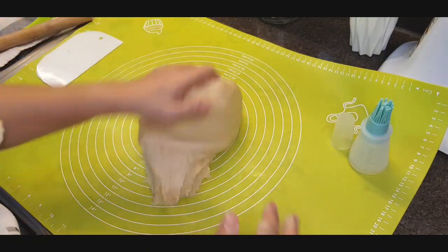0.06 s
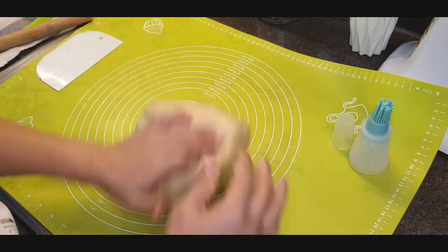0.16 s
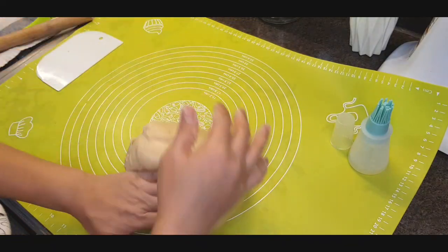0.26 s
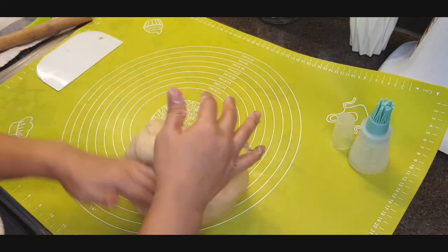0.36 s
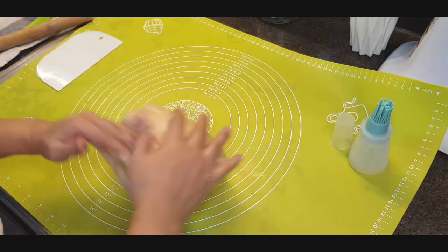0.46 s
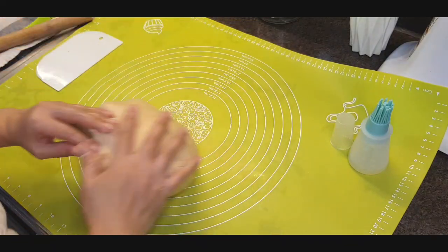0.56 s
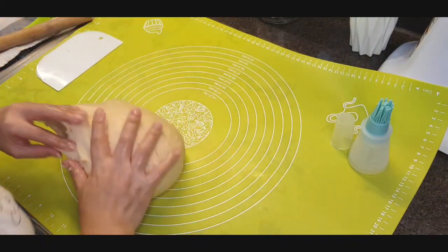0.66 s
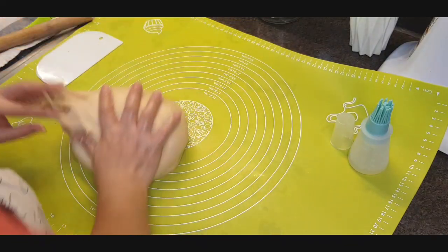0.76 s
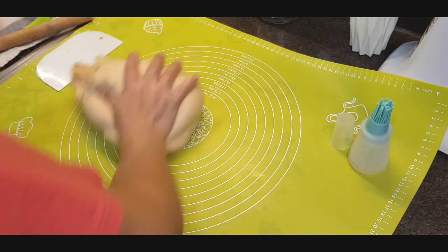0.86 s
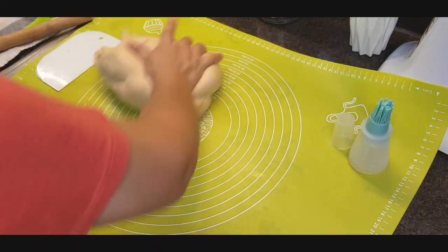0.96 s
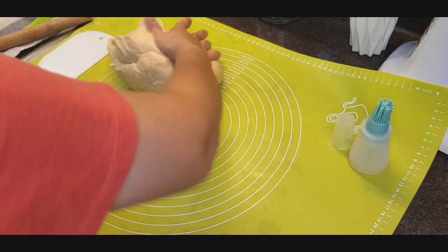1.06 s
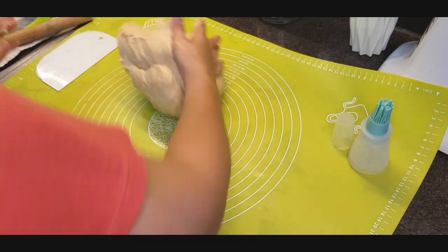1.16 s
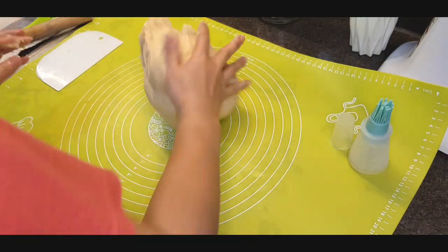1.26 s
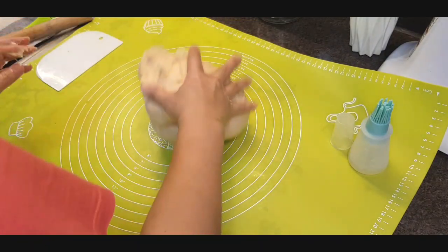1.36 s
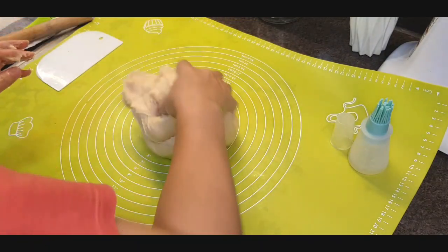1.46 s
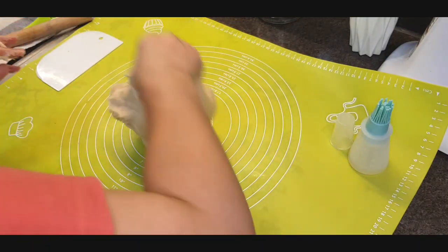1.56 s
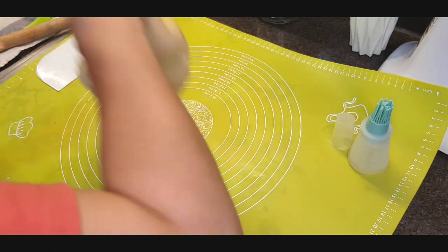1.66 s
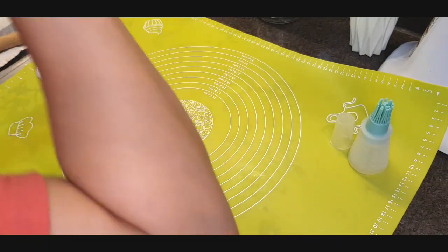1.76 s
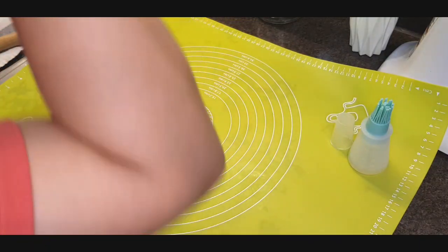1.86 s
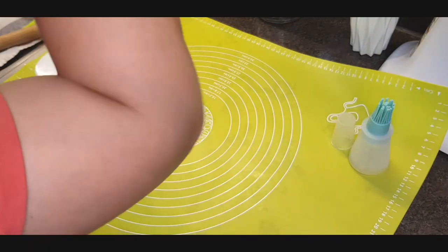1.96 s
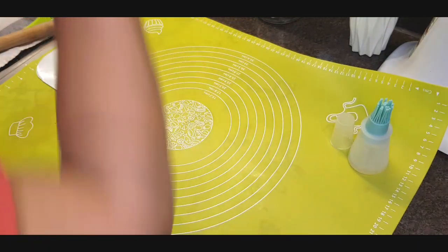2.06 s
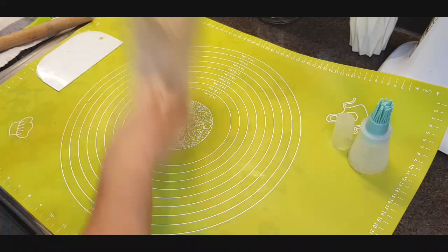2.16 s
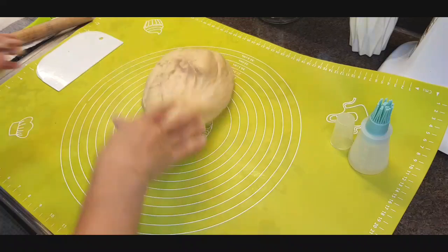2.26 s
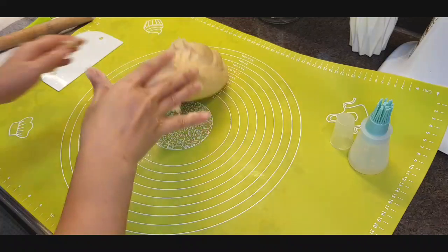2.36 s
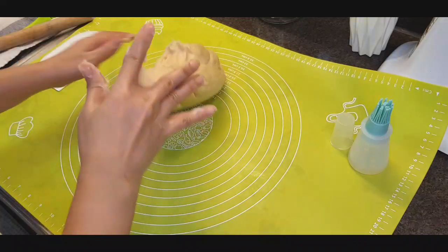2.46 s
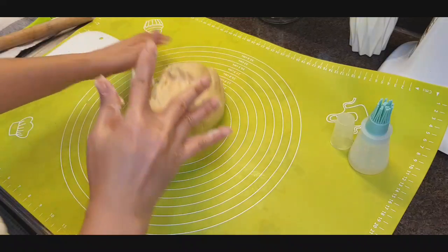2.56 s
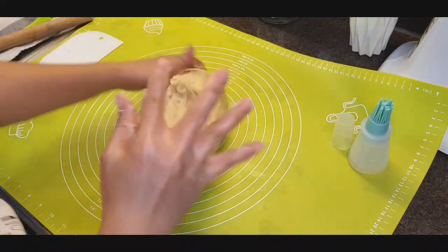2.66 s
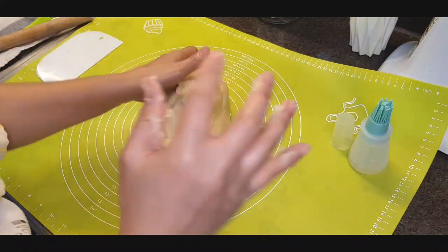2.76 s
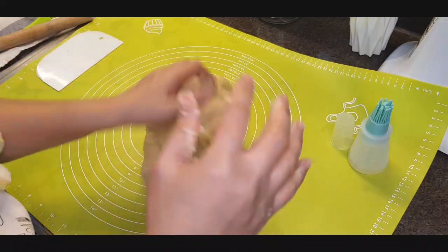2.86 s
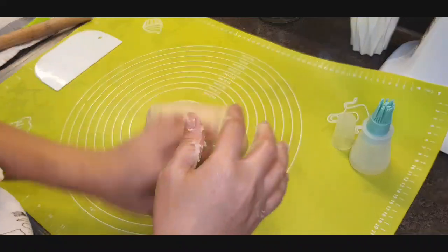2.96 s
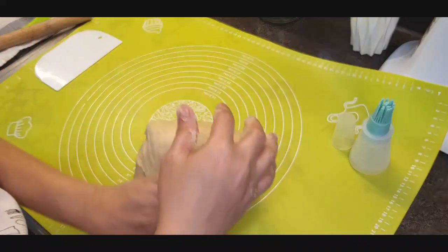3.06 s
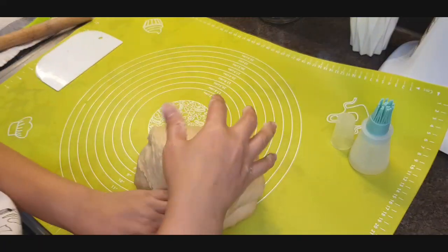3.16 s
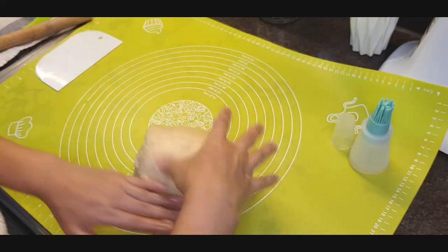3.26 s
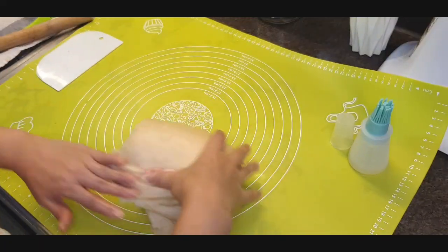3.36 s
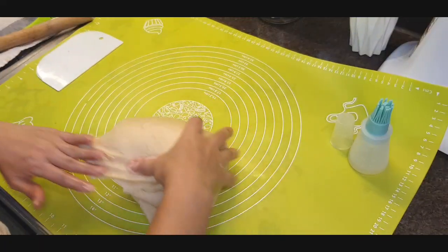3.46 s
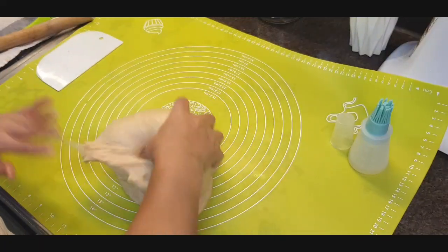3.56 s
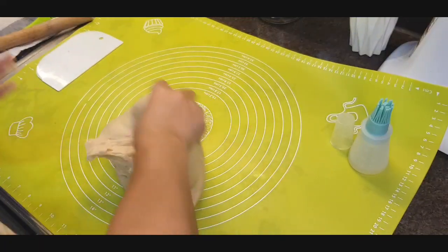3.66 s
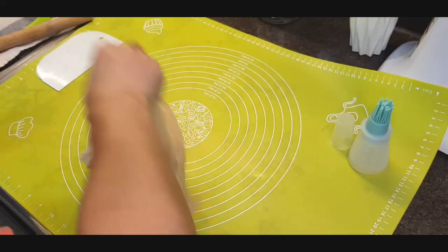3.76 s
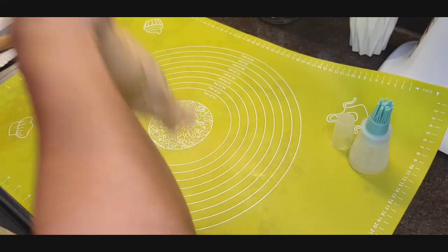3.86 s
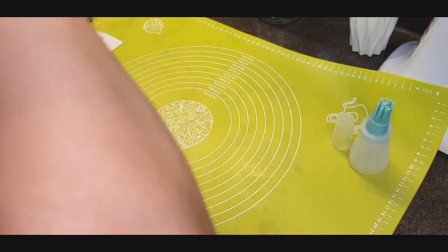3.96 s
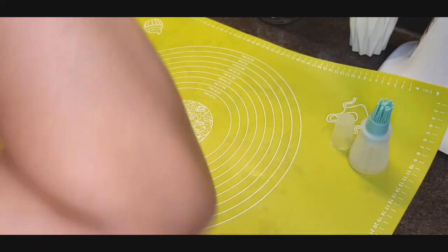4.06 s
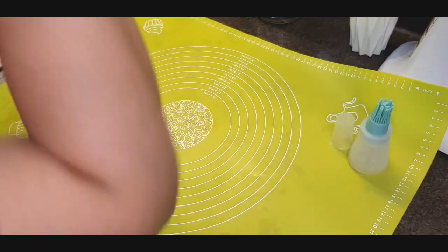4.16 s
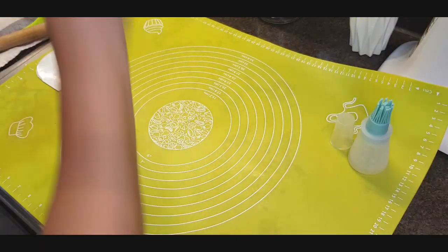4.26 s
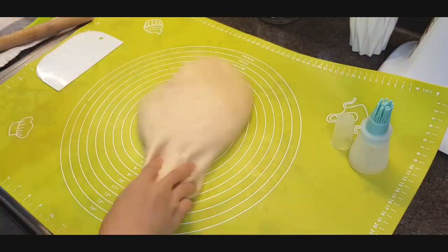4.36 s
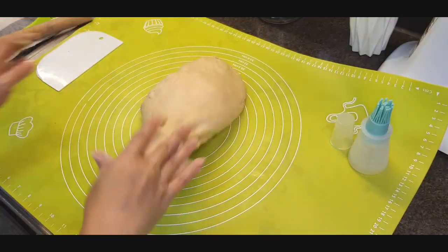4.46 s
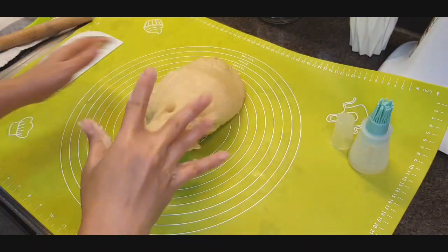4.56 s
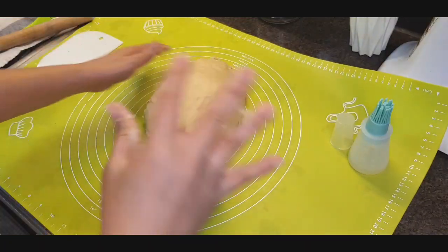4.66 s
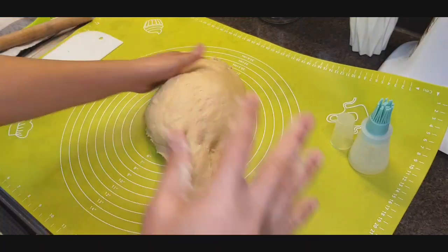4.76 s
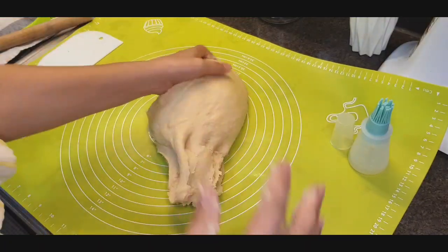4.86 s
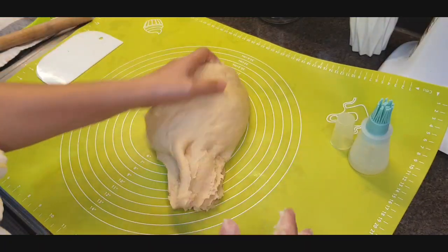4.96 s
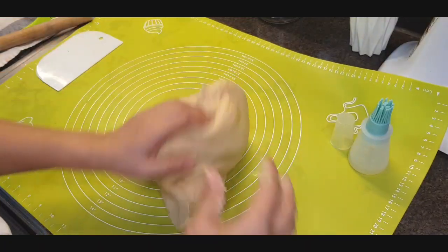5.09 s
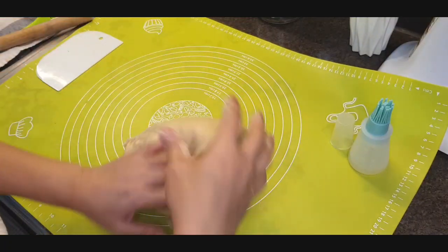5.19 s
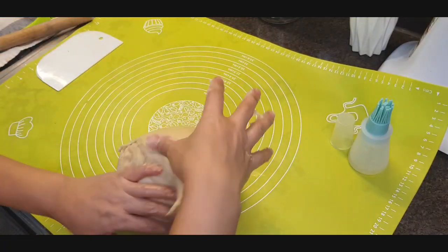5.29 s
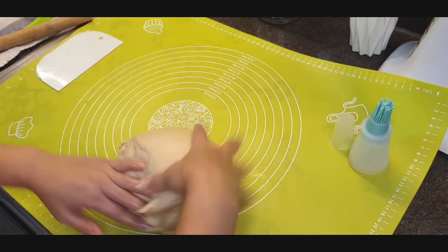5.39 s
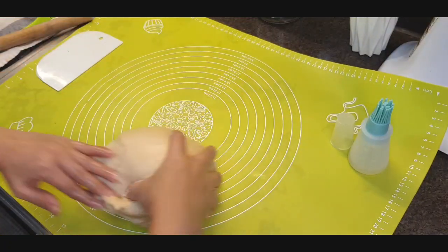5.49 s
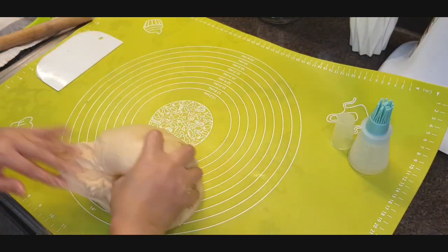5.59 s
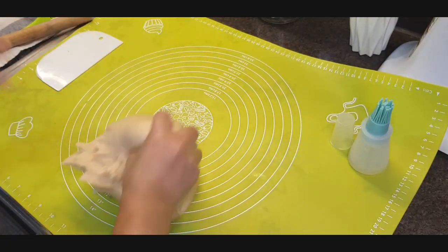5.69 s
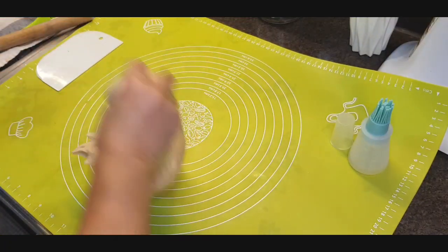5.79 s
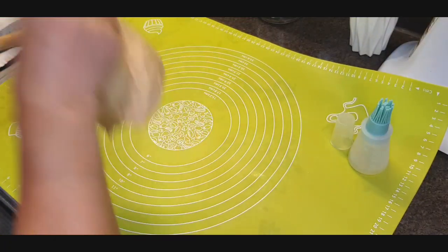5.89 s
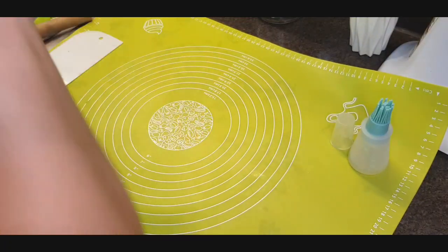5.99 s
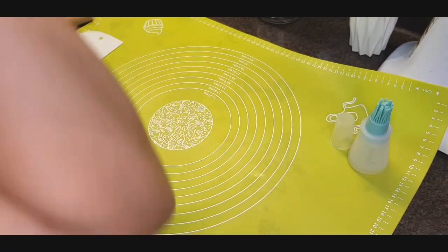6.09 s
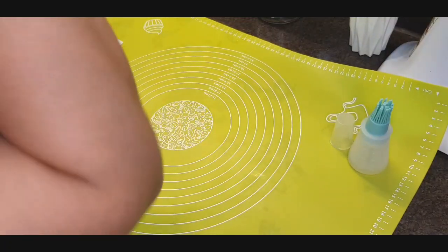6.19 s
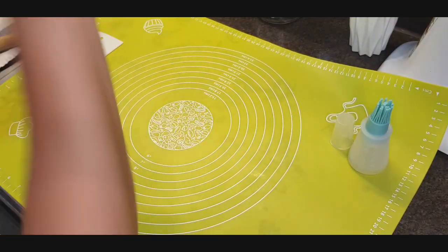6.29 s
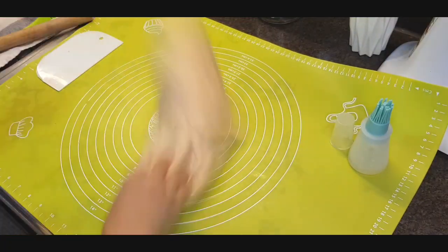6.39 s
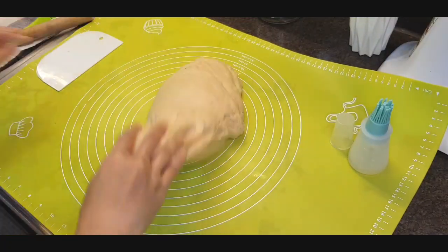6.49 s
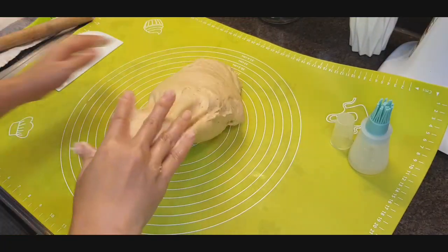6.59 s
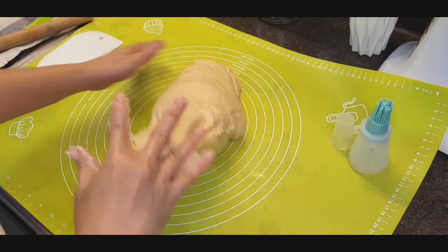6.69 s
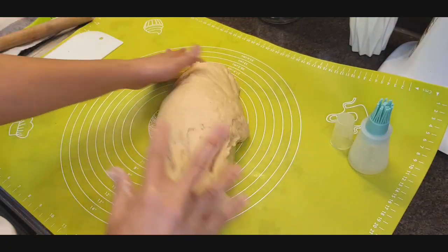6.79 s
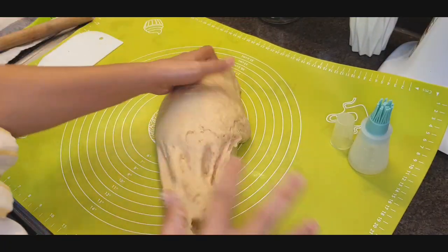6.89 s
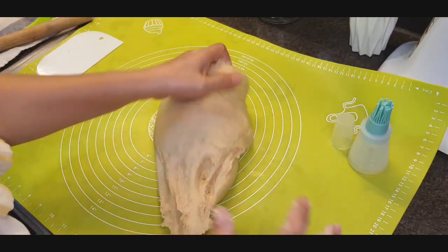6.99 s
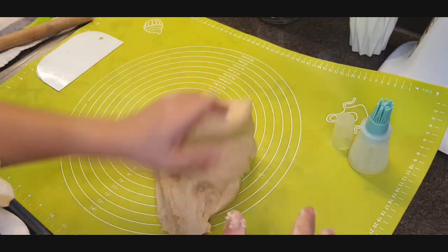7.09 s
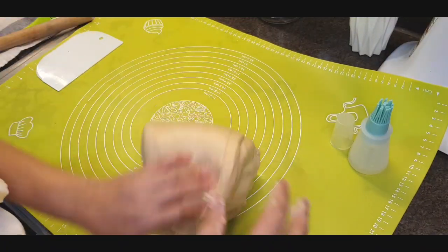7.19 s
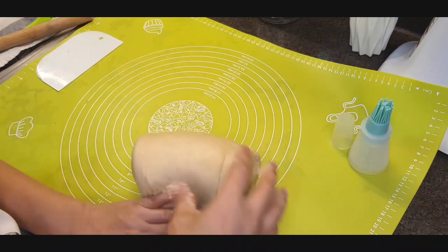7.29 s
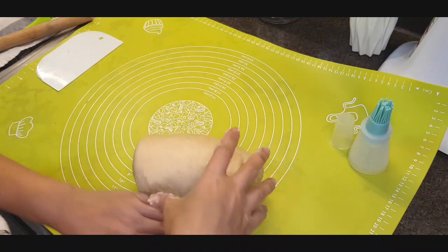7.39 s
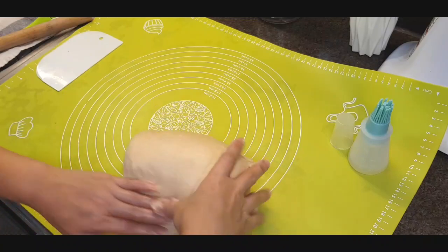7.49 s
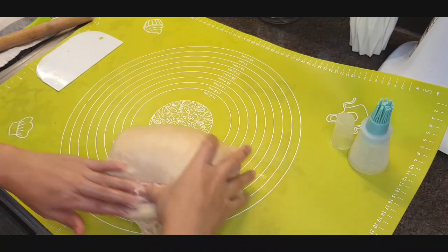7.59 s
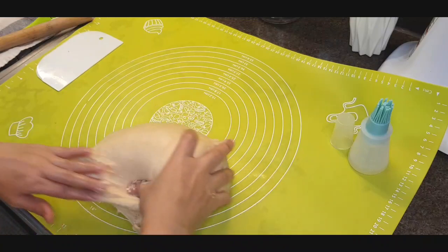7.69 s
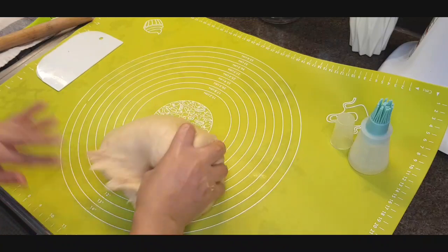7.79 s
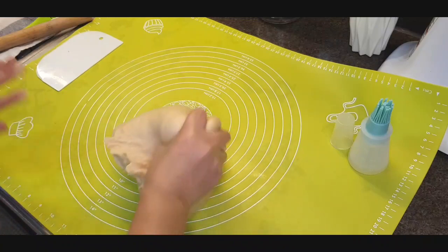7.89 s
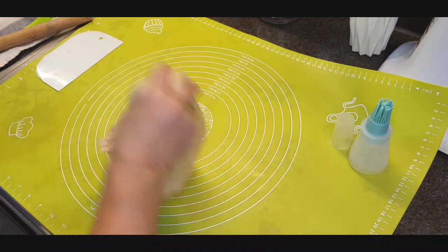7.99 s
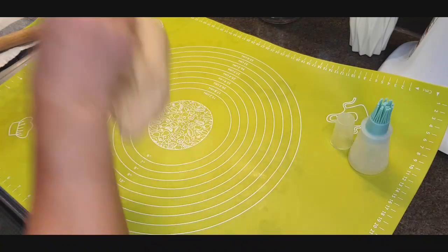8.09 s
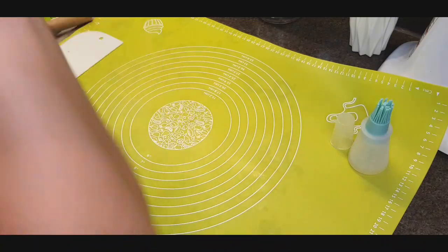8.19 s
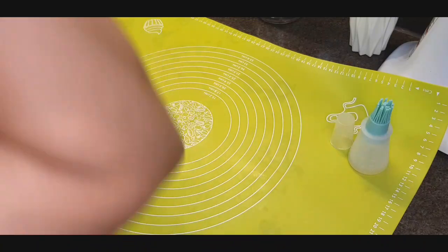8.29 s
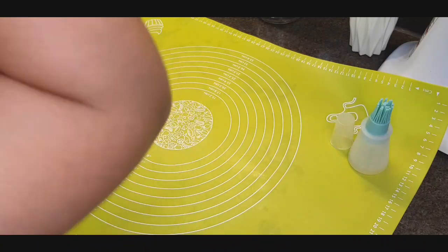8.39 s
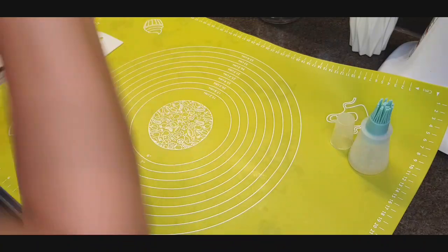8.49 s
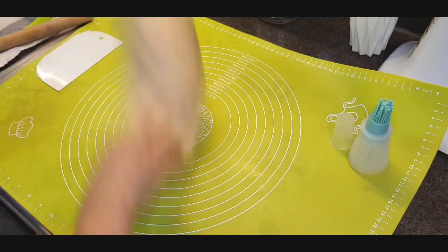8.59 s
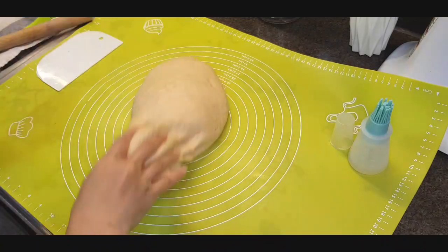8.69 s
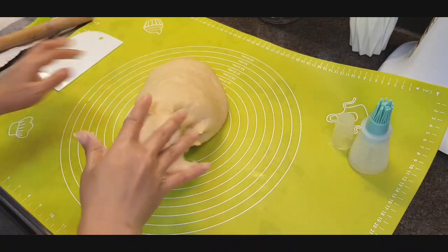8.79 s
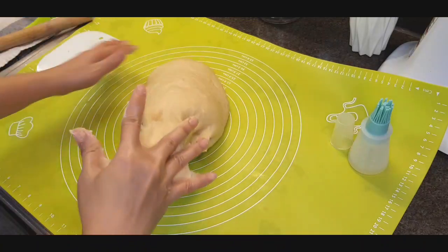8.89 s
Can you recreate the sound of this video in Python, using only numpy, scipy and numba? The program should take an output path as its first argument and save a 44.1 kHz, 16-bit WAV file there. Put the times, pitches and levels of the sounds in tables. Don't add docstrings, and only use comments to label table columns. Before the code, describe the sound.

Four loud wet dough splats ring off a small hard kitchen, separated by faint kneading, sticky tearing and soft puffs of air on the left.

```python
import sys
import numpy as np
from scipy import signal
from scipy.fft import rfft, irfft, next_fast_len
from scipy.io import wavfile
from scipy.ndimage import uniform_filter1d
from numba import njit

SR = 44100
rng = np.random.default_rng(int(sys.argv[2]) if len(sys.argv) > 2 else 0)


def volts_from_db(level):
    exponent = np.asarray(level, float) / 20
    return 10 ** exponent


def digitize_waveform(pressure):
    field = np.atleast_2d(pressure).T
    bounded = np.clip(field, -1, 1)
    quanta = np.round(bounded * 32767).astype(np.int16)
    wavfile.write(sys.argv[1], SR, quanta)


N = 394254


def unit(x):
    return x / np.sqrt(np.mean(x ** 2))


def spectrum(table, n):
    hz, value = np.transpose(table)
    bin_hz = np.arange(n // 2 + 1) * SR / n
    return np.interp(np.log(bin_hz + 1), np.log(hz), value)


def colour(x, table):
    size = x.shape[-1]
    n = next_fast_len(size, real=True)
    return unit(irfft(rfft(x, n) * volts_from_db(spectrum(table, n)), n)[..., :size])


# pitch_hz, likeness_0_to_1
LIKENESS = [(60, 0.98), (130, 0.5), (290, 0.8), (640, 0.44), (1410, 0), (3100, 0.19), (6820, 0), (15000, 0)]


def pair(size):
    n = next_fast_len(size, real=True)
    alike = np.clip(spectrum(LIKENESS, n), 0, 1)
    mid, side = rfft(rng.standard_normal((2, n)))
    both = np.sqrt(1 + alike) * mid + np.sqrt(1 - alike) * side * [[1], [-1]]
    return irfft(both, n)[:, :size] / np.sqrt(2)


def walk(rate):
    hold = int(SR / rate)
    steps = np.repeat(rng.standard_normal(N // hold + 1), hold)
    return uniform_filter1d(uniform_filter1d(steps, hold), hold)[:N]


def grains(n, rate, spread_db):
    happens, height, luck = rng.random((3, 2, n))
    size = np.minimum(-np.log(1 - luck), 4)
    return unit((happens < rate / SR) * (height - 0.5) * volts_from_db(spread_db * size))


def ring(hz, t60, attack, n):
    t = np.arange(n) / SR
    return np.sin(2 * np.pi * hz * t) * 1000.0 ** (-t / t60) * (1 - np.exp(-t / attack))


def add(out, s, x):
    i = int(s * SR)
    out[..., i:i + x.shape[-1]] += x[..., :N - i]


def onset(n, late, rise):
    return np.clip((np.arange(n) / SR - late) / rise, 0, 1)


def swell(s, rise_ms, fade_ms, hold_s=0):
    t_ms = 1e3 * (np.arange(0, N, 32) / SR - s)
    rise_db = np.minimum(20 * t_ms / rise_ms, 0)
    fade_db = 20 * np.maximum(t_ms - 1e3 * hold_s, 0) / fade_ms
    return volts_from_db(rise_db - fade_db).repeat(32)[:N]


@njit
def svf(x, hz, width):
    y, band, low = np.empty(len(x)), 0.0, 0.0
    for i in range(len(x)):
        g = np.tan(np.pi * hz[i] / SR)
        v = (band + g * (x[i] - low)) / (1 + g * (g + width))
        band, low, y[i] = 2 * v - band, low + 2 * g * v, width * v
    return y


def steady_band(x, hz, width):
    return svf(x, np.full(N, hz), width)


# pitch_hz, level_db (per Hz)
HUSH = [(90, -33.5), (380, -12), (1200, -17.5), (1800, -16.5), (3400, -27.5), (7200, -29.5), (8300, -34),
        (15500, -37)]
# time_s, level_db
WEIGHT = [(0.0, -59), (0.55, -49.5), (1.17, -55.5), (1.5, -59), (2.96, -52), (3.2, -53), (3.86, -51),
          (4.05, -58.5), (5.0, -52.5), (5.45, -56.5), (5.95, -48.5), (6.25, -54), (7.89, -53.5),
          (8.12, -48.5), (8.6, -57.5), (8.94, -55)]


def air():
    hush = colour(pair(N), HUSH) * volts_from_db(-55.5 + 0.5 * walk(2.1))
    rumble = volts_from_db(-2 + 3 * walk(8)) * unit(steady_band(rng.standard_normal(N), 58.0, 0.45))
    drone_hz, drone_width_hz = 114.0, 5.7
    drone = unit(steady_band(rng.standard_normal(N), drone_hz, drone_width_hz / drone_hz))
    drone = volts_from_db(-3.5 + 4.1 * walk(7.2)) * drone
    sway = sum(swell(row[0] + 0.12, rise_ms=190, fade_ms=310) for row in SLAPS)
    lean = volts_from_db(np.interp(np.arange(N) / SR, *np.transpose(WEIGHT)))
    return hush + (lean + volts_from_db(-44.5) * sway) * (rumble + drone)


# peak_s, peak_db, pitch_hz
AIR_PUFFS = [(0.583, -36, 71), (0.647, -38, 66), (0.761, -36, 67), (0.838, -37, 61), (1.097, -34.5, 66),
             (2.737, -37, 69), (3.128, -39, 68.5), (3.177, -36, 70), (3.216, -33, 57.6),
             (3.336, -25.5, 75.4), (3.38, -30, 57.6), (3.52, -31.5, 75), (3.706, -35, 58.7),
             (3.753, -30.5, 69.6), (3.795, -33.5, 56.6), (5.58, -35, 61.6), (5.88, -34, 69.4),
             (5.971, -27.5, 65.7), (6.038, -30, 60), (6.139, -34, 84), (6.245, -33.5, 63), (6.342, -38, 58),
             (6.503, -14, 81), (6.747, -32.5, 86), (6.792, -22.5, 55.5), (6.871, -34, 78.5),
             (7.013, -32.5, 76), (7.202, -26, 67.5), (7.658, -36.5, 56.8), (8.013, -36, 61)]


def puffs():
    flutter = unit(steady_band(rng.standard_normal(N), 55.0, 0.74))
    out = volts_from_db(-63.5 + 1.7 * walk(1.2)) * flutter
    t = np.arange(-2048, 2048) / SR
    for (s, db, hz), turn in zip(AIR_PUFFS, rng.random(len(AIR_PUFFS))):
        swirl = np.exp(-(t / 0.016) ** 2) * np.cos(2 * np.pi * (hz * t + turn))
        add(out, s + t[0], volts_from_db(db) * swirl)
    return np.array([out, 0.035 * out])


# pitch_hz, t60_s (time to fade 60 dB), level_db
ECHO_OCTAVES = [(125, 0.34, 13), (250, 0.91, -6.5), (510, 0.37, 7), (990, 0.43, 4.5), (1950, 0.49, 1),
                (3780, 0.47, 2.5), (8300, 0.45, 2), (13550, 0.4, 4.5)]


def tail():
    n = 24000
    t, noise, out = np.arange(n) / SR, rfft(pair(n)), 0
    for k, (hz, t60, db) in enumerate(ECHO_OCTAVES):
        share = spectrum([(row[0], float(j == k)) for j, row in enumerate(ECHO_OCTAVES)], n)
        out = out + volts_from_db(db - 60 * t / t60) * irfft(noise * share, n)
    return out


def kitchen(x, wet_db):
    walls = tail()
    walls = walls * onset(walls.shape[1], late=0.0016, rise=0.0019) / np.sqrt(np.sum(walls ** 2) / 2)
    return x + volts_from_db(wet_db) * signal.fftconvolve(x.mean(axis=0)[None], walls, axes=1)[:, :N]


# time_s, level_db
RESTLESS = [(0, -81.5), (1.5, -89), (2.1, -67), (3.3, -66), (4.3, -67), (4.9, -61), (6.3, -57.5),
            (7.0, -63), (8.0, -67.5), (8.94, -56)]
PEELING = [
    (1.63, -44.5, 1692, 87, 44),
    (3.82, -38.5, 980, 167.5, 85),
    (5.87, -36.5, 990, 92, 78),
    (8.08, -40, 990, 124, 59),
]
PRESSING = [(0.086, -56.5, 1300, 160, 110), (2.678, -40.5, 1700, 8, 90), (7.528, -46, 1550, 15.6, 122),
            (1.9, -54.5, 900, 60, 500), (2.4, -68.5, 880, 100, 150), (6.12, -58, 760, 180, 130),
            (5, -59.5, 1100, 150, 81)]
RUBBING = [(.15, -50, 1350, 110, 80.4), (.45, -52, 2085, 20, 160), (1.04, -56, 1600, 260, 294),
           (1.28, -64, 1510, 100, 98.5), (2.2, -52.5, 990, 110, 100), (2.9, -49.5, 1700, 71, 223),
           (3.71, -64, 1300, 20, 150), (4.31, -57, 1043, 60, 60), (4.79, -53.5, 1800, 12, 120.4),
           (5.11, -49.5, 2050, 220, 250), (5.34, -57, 1700, 56, 304), (6.88, -57, 1300, 20, 300),
           (7.09, -52.5, 1186, 140, 340), (8.308, -66.5, 1295, 60, 300)]


def gestures():
    t = np.arange(N) / SR
    idle_mix, idle_hz = (0, -2.5, -3.5, -23), 1250
    wander_db = 6.1 * np.array([walk(9) for _ in idle_mix])
    gains = volts_from_db(np.interp(t, *np.transpose(RESTLESS)) + np.array([idle_mix]).T + wander_db)
    weight = gains[1] ** 2
    pitch = idle_hz * weight
    swings = [(row[0] - 0.01, -52.5, idle_hz, 33, 20) for row in SLAPS]
    # squash, hollow, tearing, finest fizz; then seconds held at full strength
    kinds = ((PEELING, (-13, -1, -25.5, -11), 0.04), (PRESSING, (-1, -9, -16, -22), 0.07),
             (RUBBING, (-13.5, -2, -9.5, -18.5), 0.03), (swings, (-1.5, -12.5, -7.5, -20), 0))
    for table, mix, hold_s in kinds:
        for s, db, hz, rise_ms, fade_ms in table:
            near = slice(max(int((s - 1) * SR), 0), int((s + 1) * SR))
            layers = volts_from_db(db + np.array([mix]).T) * swell(s, rise_ms, fade_ms, hold_s)[near]
            gains[:, near] += layers
            glide = np.clip(1 + 0.74 * (t[near] - s - hold_s), 0.7, 1.3)
            pitch[near] += layers[1] ** 2 * hz * glide
            weight[near] += layers[1] ** 2
    return gains, pitch / weight


# pitch_hz, width_share, level_db
SQUASH = [(300., .35, 0), (420., .5, -3), (620., .6, -8), (2600., 1.6, -19)]
# pitch_hz, level_db (per Hz)
TEARING = [(1500, 10.5), (2500, 15.5), (4200, 0), (7000, 3.5), (8500, -13.5), (11000, 4.5), (14500, -14.5),
           (15700, -9)]
# pitch_hz, level_db (per Hz)
FINE_FIZZ = [(6000, -28), (9000, -3), (12500, -1), (15500, -0.5)]


def kneading():
    (pressing, peeling, tearing, fizzing), hollow_hz = gestures()
    hollow_hz = hollow_hz * (1 + 0.09 * walk(40))
    coarse, middle, fine = [grains(N, rate=rate, spread_db=1.5) + 0.7 * pair(N)
                            for rate in (2500, 5000, 12000)]
    squash = 0
    for hz, wide, db in SQUASH:
        squash = squash + volts_from_db(db) * steady_band(steady_band(coarse[0], hz, wide), hz, wide)
    hollow = []
    for x in middle * volts_from_db(3.7 * walk(90)):
        main = unit(svf(svf(x, hollow_hz, 0.5), hollow_hz, 0.5))
        hollow.append(main + 0.8 * unit(svf(x, 1.7 * hollow_hz, 1.3)))
    dull = pressing * unit(squash) + peeling * unit(np.array(hollow))
    return dull + tearing * colour(fine, TEARING) + fizzing * colour(fine, FINE_FIZZ)


def pops(table, attack, pan_db):
    out = np.zeros((2, N))
    snap_fade = volts_from_db(-60e3 * np.arange(2048) / SR / 4.8)
    for s, db, hz, t60_ms, snap_db in table:
        snap = volts_from_db(snap_db) * pair(2048) * snap_fade
        side_db = pan_db + 2.5 * rng.standard_normal()
        sides = volts_from_db(db + side_db * np.array([[0.5], [-0.5]]))
        add(out, s, sides * (ring(hz, t60_ms / 1e3, attack, 2048) + snap))
    return out


# start_s, peak_db, pitch_hz, t60_ms, snap_db
SMALL_SMACKS = [(1.316, -39, 1470, 12, -12), (1.664, -30, 1400, 5.4, -30), (.447, -35, 1850, 14, -20),
                (2.677, -31, 480, 15, -14), (7.528, -33, 450, 15, -16), (2.866, -14.5, 2280, 8.7, -26),
                (2.872, -24, 2380, 19, -32), (3.761, -28, 1200, 8, -18), (3.88, -22, 1080, 11, -23),
                (4.785, -29.5, 1540, 13, -9), (5.123, -32, 2270, 12, -13), (5.85, -27, 950, 14, -16),
                (5.892, -24.5, 900, 18, -24), (5.913, -19, 1120, 15, -22), (6.877, -37, 1090, 17, -20),
                (8.059, -31, 1040, 12, -22), (8.106, -23, 1020, 13, -14.5), (8.126, -30.5, 1270, 27, -19)]


def smacks():
    return pops(SMALL_SMACKS, 0.0007, pan_db=3)


# start_s, peak_db, pitch_hz, t60_ms, snap_db
DOUGH_THUDS = [
    (2.2682, -9, 571, 20, -40),
    (4.4382, -10, 690, 20, -40),
    (4.7845, -30, 450, 25, -16),
    (6.4965, -5, 430, 30, -40),
    (6.511, -9, 400, 30, -40),
    (6.542, -16, 450, 40, -40),
    (8.7132, -7, 290, 28, -40),
]


def thuds():
    return pops(DOUGH_THUDS, 0.00034, pan_db=-1.5)


# start_s, peak_db, pitch_hz, t60_ms, snap_db
AIR_POCKETS = [(2.2685, -9, 1590, 22, -6), (2.2698, -1.5, 2015, 25, -22.5), (2.2712, 6.5, 3420, 11, -13.5),
               (2.2755, 0.5, 2110, 15, -19), (2.2806, -11.5, 2607, 8, -5.5), (4.4381, 3, 1590, 11, -34),
               (4.4416, -5, 2800, 17, -11), (4.4488, 4, 2540, 1.5, -9), (6.4962, -5.5, 1850, 14, -5.5),
               (6.5, -0.5, 2490, 6.1, 3), (8.7098, -1.5, 1580, 5.1, -5.5), (8.7134, -9, 1300, 10, -12.5),
               (8.7180, -2, 2053, 11, -16), (8.7246, -2.5, 1950, 19, -3.5)]


def pockets():
    return pops(AIR_POCKETS, 0.00012, pan_db=0)


# start_s, spread_ms, t60_ms (fading), boom_db (counter), knock_db (counter)
SLAPS = [
    (2.2667, 2.2, 139, -16.5, -30),
    (4.4375, 2, 49.5, -27.5, -42),
    (6.496, 0.74, 182, -14.5, -22),
    (8.708, 4.87, 250, -24.5, -22.5),
]
# pitch_hz, level_db (per Hz)
SPLAT_COLOURS = [
    [(120, -33), (200, -8.5), (906, -11), (1330, -8), (2600, 2.5), (4100, -12), (13200, -17), (15500, -24)],
    [(120, -46), (200, -15.5), (677, -4), (974, -2.5), (1560, -2.5), (2290, -3.5), (12500, -18.5),
     (15500, -25)],
    [(120, -36), (200, -15.5), (414, -5), (812, -12.5), (2130, -9), (4330, -14.5), (12000, -16.5),
     (15500, -25.5)],
    [(120, -48), (200, -43), (283, -0.5), (506, -18), (1980, -9), (5490, -19), (12500, -14.5), (15500, -21)],
]
# pitch_hz, level_db, t60_s
COUNTER_BOOM = [(78.3, -7.5, 0.24), (121.7, -5.5, 0.47), (157.5, -8.5, 0.38)]
# pitch_hz, level_db, t60_s
COUNTER_KNOCK = [(284.6, -1.5, 0.27), (364.6, -7, 0.5), (414.7, -29.5, 0.11), (456, 4.5, 0.055),
                 (538.4, -4, 0.13), (681, 1, 0.13)]


def slaps():
    out, t = np.zeros((2, N)), np.arange(8192) / SR
    for (s, spread_ms, t60_ms, boom_db, knock_db), tint in zip(SLAPS, SPLAT_COLOURS):
        spread_s = spread_ms / 1e3
        shape = onset(8192, 0, spread_s) ** 2 * volts_from_db(-60e3 * t / t60_ms)
        cracks = grains(8192, rate=7000, spread_db=2.5) + pair(8192)
        add(out, s, volts_from_db(-6.5) * shape * colour(cracks, tint))

        echo_db = -15 + 8.5 * np.log10(t60_ms / 103.0)
        echo = colour(tail(), tint) * volts_from_db(2 * walk(180)[:24000])
        echo = echo * onset(echo.shape[1], spread_s, 0.017)
        add(out, s, volts_from_db(echo_db - 13.5) * echo[:, :20000])

        for modes, blow_db in ((COUNTER_BOOM, boom_db), (COUNTER_KNOCK, knock_db)):
            for (hz, mode_db, t60), luck in zip(modes, rng.standard_normal((len(modes), 3))):
                beat = ring(hz, t60, 0.00022, 30000)
                beat = beat + 0.99 * ring(hz + 9 * luck[1], 0.95 * t60, 0.004, 30000)
                side_db = 0.6 * luck[2] * np.array([[1], [-1]])
                level = volts_from_db(blow_db + mode_db + 1.1 * luck[0] + side_db)
                add(out, s + spread_ms / 1920.0, level * beat)
    return out


def scene():
    blows = slaps() + kitchen(pockets() + thuds(), wet_db=-10)
    hands = kitchen(volts_from_db(-2) * kneading(), wet_db=-3) + kitchen(smacks(), wet_db=-8)
    left, right = (blows + hands + air()) * volts_from_db([[0.6], [-0.6]])
    return np.array([np.roll(left, 5), right]) + puffs()


def band_limit(x):
    return signal.sosfilt(signal.butter(12, 16290, fs=SR, output="sos"), x)


def record(dry):
    mic = signal.sosfilt(signal.butter(2, 38, "high", fs=SR, output="sos"), dry)
    mic = signal.sosfilt(signal.ellip(8, 0.3, 50, 15600, fs=SR, output="sos"), mic)
    return band_limit(np.clip(mic, -1, 1))


dry = scene()
out = record(dry)
digitize_waveform(out)
```